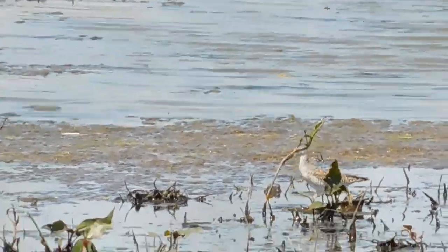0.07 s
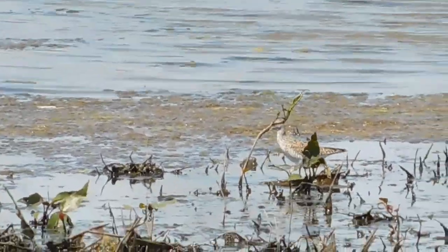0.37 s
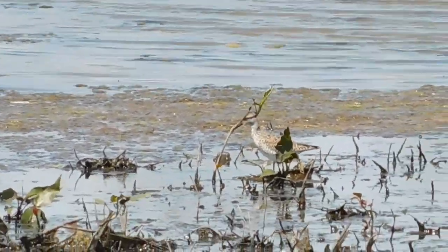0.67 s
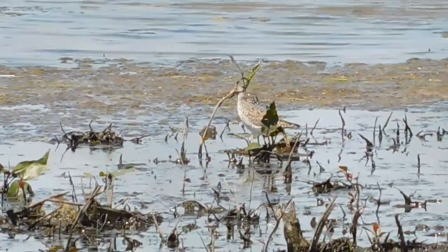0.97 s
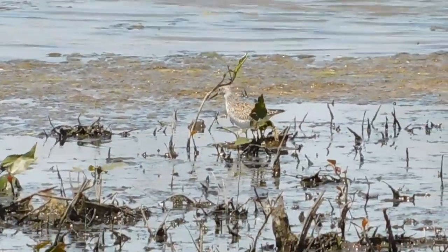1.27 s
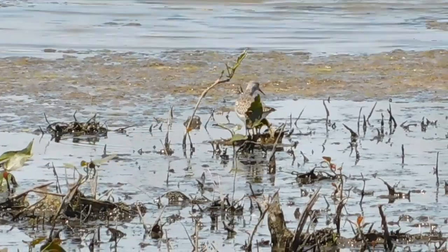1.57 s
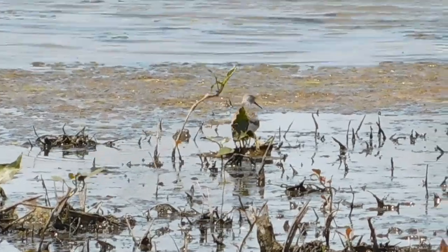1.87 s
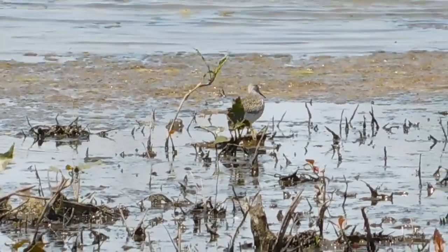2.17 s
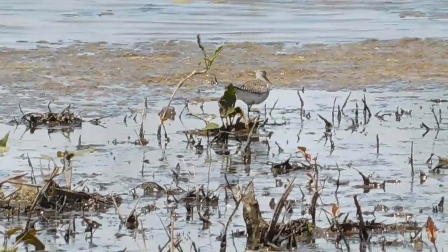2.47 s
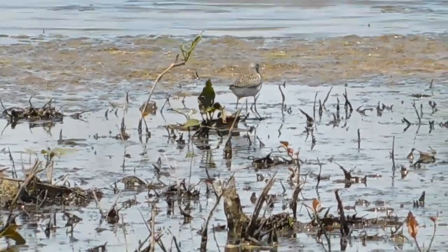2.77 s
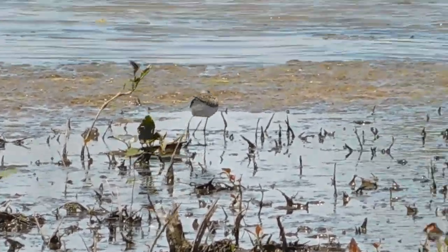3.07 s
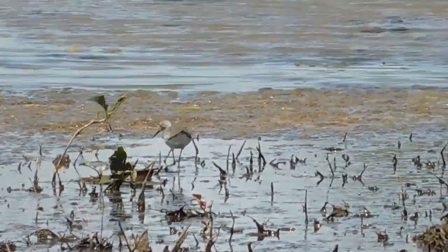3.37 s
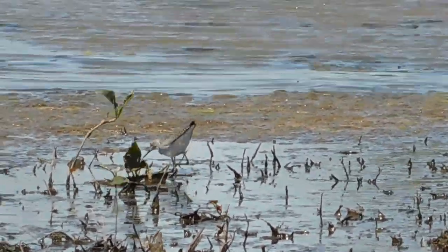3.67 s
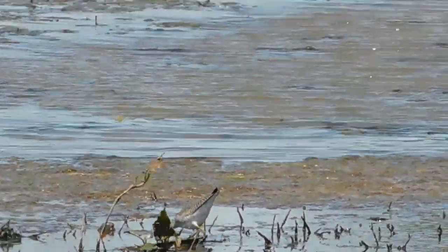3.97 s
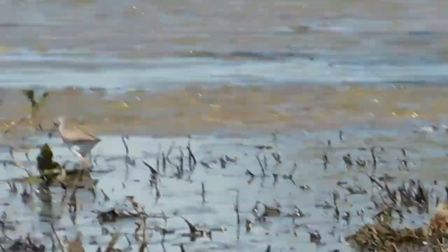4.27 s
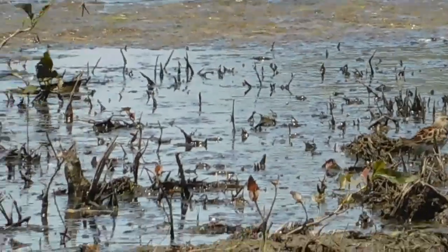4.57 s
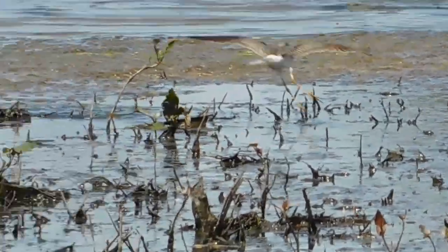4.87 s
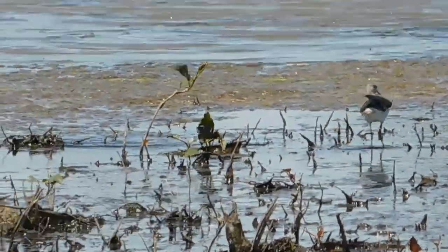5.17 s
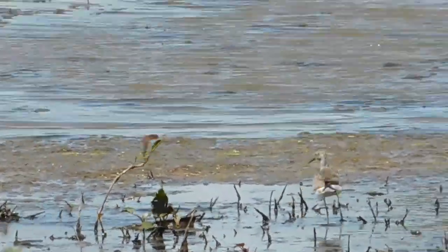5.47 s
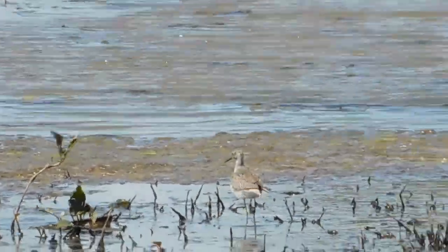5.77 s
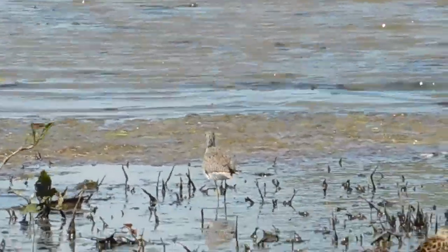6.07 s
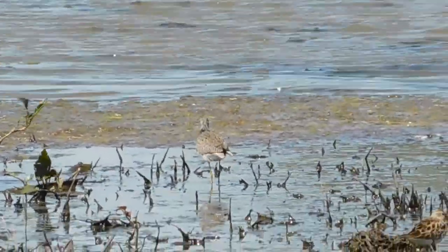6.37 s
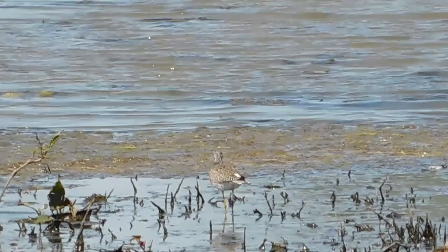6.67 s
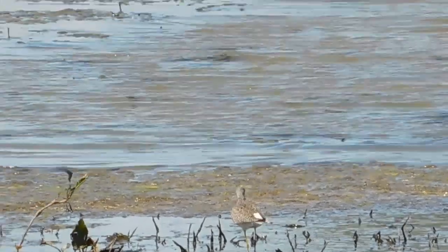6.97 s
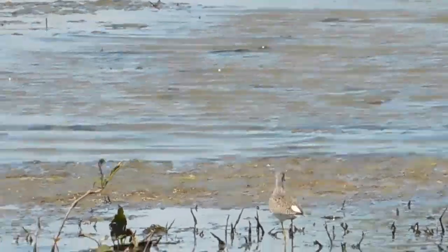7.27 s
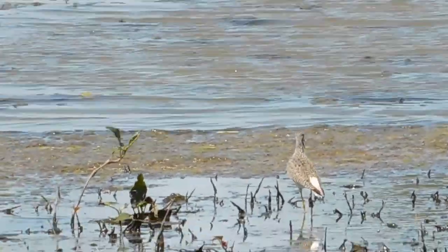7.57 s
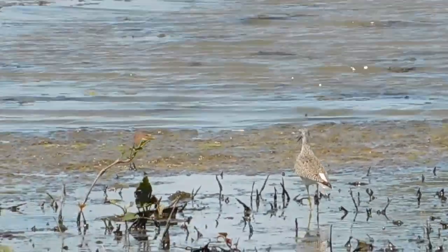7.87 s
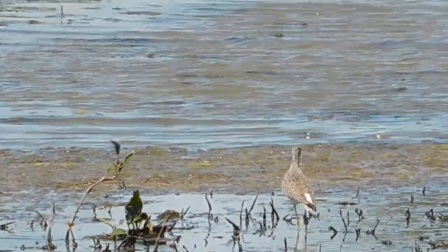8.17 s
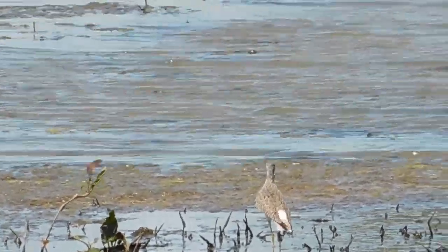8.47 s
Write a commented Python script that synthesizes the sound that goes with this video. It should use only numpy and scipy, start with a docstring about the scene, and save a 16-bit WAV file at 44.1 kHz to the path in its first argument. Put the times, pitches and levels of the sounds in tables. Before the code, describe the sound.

Wind thumps and rumbles on the microphone, easing as a wading bird starts piping rapid, repeated falling notes.

```python
"""A sandpiper whistles on an open marsh, then breaks into a quick run of falling calls: near-pure
tones that glide in pitch, the quick ones shaped by a throat resonance. Far birds chip, trill and toot.
Gusts shed eddies at the two microphone ports of a hand-held camera, hard at first and again at the end.
The camera's lens drive whirs faintly, and its body ticks and rubs under the fingers."""
import sys
import numpy as np
from scipy import signal
from scipy.fft import irfft, next_fast_len
from scipy.io import wavfile
from scipy.ndimage import uniform_filter1d

SR = 44100
rng = np.random.default_rng(int(sys.argv[2]) if len(sys.argv) > 2 else 0)


def wrap_up_sound(samples):
    """Save the sound to the file named by the first command line argument, as 16-bit audio."""
    columns = np.atleast_2d(samples).T
    # keep every value between -1 and 1, then stretch to whole-number steps
    tamed = np.clip(columns, -1, 1)
    steps = np.round(tamed * 32767).astype(np.int16)
    wavfile.write(sys.argv[1], SR, steps)


N = 379701
TIME = np.arange(N) / SR
FREQS = np.fft.rfftfreq(2 * next_fast_len(N // 2 + 1), 1 / SR)

# single hard eddies: time_s, relative_level_db, swing_hz, port (0 left, 1 right)
HARD_EDDIES = [(.205, -1, 400, 1), (0.2165, 4.5, 507, 1), (0.4427, -4.5, 430, 1), (.459, -5.5, 120, 1),
               (.4771, -5.5, 583, 1), (0.684, -11.5, 400, 1), (.8575, -7, 285, 1), (.914, -12, 478, 0),
               (.9822, -3.5, 390, 1), (1.1328, -7.5, 464, 1), (1.2, 1, 535, 1), (1.3034, -1, 600, 1),
               (1.6945, 1.5, 496, 1), (2.3312, -2.5, 900, 1), (2.5043, -5.5, 655, 1),
               (2.5293, -0.5, 750, 1), (2.7664, -10.5, 504, 1), (3.04, -13, 470, 0), (3.103, -9, 460, 0),
               (6.724, -14.5, 507, 0), (7.33, -21, 302, 0), (8.287, -8, 222, 1)]


def gain_of(db):
    """Amplitude ratio: a factor of ten for every 20 dB."""
    return 10 ** (np.asarray(db) / 20)


def unit_rms(x):
    """Normalisation to a mean power of 1."""
    return x / np.sqrt(np.mean(x ** 2) + 1e-30)


def colour(points):
    """Spectral envelope: gain at every frequency, interpolated in dB over log frequency."""
    hz, db = np.transpose(points)
    return gain_of(np.interp(np.log(FREQS + 1), np.log(hz), db))


def noise(gain):
    """Gaussian noise of rms 1, shaped by a spectral envelope."""
    return unit_rms(irfft(gain * rng.standard_normal(2 * len(FREQS)).view(complex))[:N])


def wander(hz):
    """Random modulation: low-pass noise of rms 1, no faster than about hz."""
    return noise(np.exp(-(FREQS / hz) ** 2))


def add(mix, start_s, sound):
    """Superposition: a sound sums into the mix from start_s on."""
    part = mix[max(round(start_s * SR), 0):][:len(sound)]
    part += sound[:len(part)]


def marsh(level_db=-59, shared=0.23):
    """Diffuse field: the wash of open air and water is only weakly coherent between the ports."""
    # spectrum of the wash: frequency_hz, density_db
    spectrum = [(300, -7), (700, 5.5), (1200, 1.5), (3300, -4.5), (3800, -14), (10000, -22), (15500, -29)]
    shape = colour(spectrum)
    return gain_of(level_db) * unit_rms(shared * noise(shape) + np.array([noise(shape), noise(shape)]))


def lens():
    """Resonance: the lens drive whirs in three steady noise bands, largely shared by the ports."""
    # modes of the drive: centre_hz, width_hz, level_db
    modes = [(1685, 49, -75.5), (2023, 204, -63), (3040, 160, -79.5)]
    shape = sum(gain_of(db) / np.sqrt(width) / (1 + ((FREQS - hz) / (width / 2)) ** 2)
                for hz, width, db in modes)
    level = np.sqrt(sum(gain_of(db) ** 2 for _, _, db in modes))
    return level * unit_rms(noise(shape) + 0.5 * np.array([noise(shape), noise(shape)]))


def handling(tick_db=-9, rise_s=0.00018, rub_s=0.045, rub_right_db=-6, slips_per_s=1200, grip_db=-79):
    """Damped impacts and stick-slip friction: the camera body ticks, and fingers rub in tiny slips."""
    # ticks of the body: start_s, relative_level_db, t60_s, left_minus_right_db
    ticks = [(2.21, -19.5, 0.033, 8.5), (3.4915, -45.5, .012, 9), (3.8504, -23, 0.009, -3),
             (4.074, -34.5, 0.017, 6), (5.526, -40.5, 0.023, 5), (8.012, -40, 0.01, 9),
             (8.299, -38, 0.019, 4), (8.564, -31.5, 0.047, 7)]
    # finger strokes: centre_s, level_db
    rubs = [(.53, -56), (1.05, -62.5), (7.71, -62), (8.27, -65), (8.51, -55.5)]
    # spectrum of a tick: frequency_hz, density_db
    tick_spectrum = [(2000, -7), (3100, 8), (4500, 2.5), (8000, 2.5), (15500, -10.5)]
    # spectrum of a rub: frequency_hz, density_db
    rub_spectrum = [(1500, -8), (3700, 1.5), (6500, 2.5), (10000, -0.5), (15500, -40)]
    out, t = np.zeros((2, N)), np.arange(SR // 10) / SR
    stroke = sum(gain_of(db) * np.exp(-((TIME - s) / rub_s) ** 2) for s, db in rubs)
    stroke += gain_of(grip_db + 2.7 * wander(8))  # the grip never rests
    attack = np.minimum(t / rise_s, 1)
    for port, side in enumerate((1, -1)):
        knocks = np.zeros(N)
        for start_s, db, t60_s, pan_db in ticks:
            add(knocks, start_s, attack * gain_of(db + tick_db + side * pan_db / 2 - 60 * t / t60_s))
        slips = rng.exponential(size=N) * (rng.random(N) < slips_per_s / SR)
        friction = stroke * unit_rms(uniform_filter1d(slips, size=40))
        out[port] = knocks * noise(colour(tick_spectrum))
        out[port] += friction * noise(colour(rub_spectrum)) * gain_of(port * rub_right_db)
    return out


def airflow(port, rise_db_per_s=900, sag_db=0.5, drop_db_per_s=556):
    """Power addition: gusts ride on the breeze to give the wind strength at one port, in dB."""
    # strength of the breeze: time_s, left_db, right_db
    breeze = [(0, -44.5, -38), (1.55, -41, -43.5), (2.7, -39, -41.5), (3.3, -51.5, -56), (4.3, -52.5, -54),
              (5.5, -52.5, -56.5), (6.5, -47, -63), (7.0, -51.5, -62), (7.4, -37.5, -42.5),
              (8.6, -38.5, -41)]
    # gusts: start_s, length_s, left_db, right_db
    gusts = [(0, 0.27, -32.5, -27), (0.194, 0.013, -29.5, -21.5), (0.259, 0.043, -42, -22.5),
             (0.44, 0.071, -31, -20.5), (.67, 0.18, -44, -40), (0.849, 0.02, -46, -26.5),
             (0.924, 0.062, -29.5, -28.5), (1.03, 0.12, -36, -38.5), (1.196, 0.071, -35.5, -22),
             (1.285, 0.046, -26.5, -18), (1.343, 0.13, -29, -27), (1.676, 0.12, -32.5, -25),
             (2.201, 0.22, -37.5, -24), (2.444, 0.17, -35, -22), (2.611, 0.064, -36, -31),
             (2.763, 0.19, -41, -33), (3.308, 0.025, -40, -62), (3.601, 0.052, -53, -44),
             (3.842, .19, -65, -35), (4.45, 0.034, -62, -34.5), (4.496, 0.21, -50, -45),
             (4.825, 0.35, -43.5, -72), (5.605, 0.26, -46, -47.5), (6.005, 0.18, -42.5, -47),
             (6.793, 0.1, -40.5, -71), (7.106, 0.031, -32, -53), (7.314, 0.066, -28.5, -36),
             (7.723, 0.15, -38.5, -36), (7.891, 0.29, -35.5, -40.5), (8.159, .14, -34.5, -33.5),
             (8.402, 0.18, -34, -46)]
    times, *breeze_db = np.transpose(breeze)
    power = gain_of(np.interp(TIME, times, breeze_db[port])) ** 2
    for start_s, length_s, *port_db in gusts:
        t = np.arange(-SR // 10, (length_s + 0.2) * SR) / SR
        rise = rise_db_per_s * np.minimum(t, 0)
        sag = sag_db * np.clip(t / length_s, 0, 1)
        drop = drop_db_per_s * np.maximum(t - length_s, 0)
        gust = gain_of(port_db[port] + rise - sag - drop)
        add(power, start_s + t[0], gust[start_s + t >= 0] ** 2)
    return 10 * np.log10(power)


def wakes(port, wake_db=-13, t60_s=0.053):
    """Decay of turbulence: the envelope of the brief churn behind each hard eddy."""
    out, t = np.zeros(N), np.arange(SR // 10) / SR
    for time_s, db, _, side in HARD_EDDIES:
        if round(side) == port:
            add(out, time_s, gain_of(db + wake_db - 60 * t / t60_s))
    return uniform_filter1d(out, size=100)


def recorder_noise(airflow_db, base_db=-65):
    """Modulation noise: faint treble from the recorder swells and fades with the gusts."""
    return noise(FREQS > 2000) * gain_of(base_db + 0.74 * (airflow_db + 33.5) + 2 * wander(150))


def wind(port, rumble_db, flutter_db=5, ceiling_db=-15, steepness=1.62, gain_db=2.5):
    """Turbulence at one port (harder air sheds smaller, higher eddies), with recorder noise added."""
    # spectrum of the slow pressure swings: frequency_hz, density_db
    rumble_spectrum = [(15, -6), (70, -1), (130, -7), (250, -19.5), (500, -36.5), (1500, -81)]
    # weight of those swings: time_s, gain_db
    swell = [(.45, 5), (1.1, -2.5), (2.4, -5), (3.4, -1), (8.6, 5)]
    mean_db = airflow(port)
    push_db = np.minimum(mean_db + flutter_db * np.minimum(wander(179), 2), ceiling_db)
    push_db = 20 * np.log10(np.hypot(gain_of(push_db), wakes(port)))
    corner_hz = 470 * 2 ** ((0.72 * push_db + 0.25 * mean_db + 27.5) / 18)
    eddies, power = np.zeros(N), np.zeros(N)
    for hz in 50 * 2 ** (np.arange(13) / 2):  # bands half an octave apart
        band = np.cos(np.pi / 2 * np.clip(2 * np.log2((FREQS + 1) / hz), -1, 1))
        weight = hz ** 0.94 * np.exp(-(hz / corner_hz) ** steepness)
        eddies += weight * noise(band)
        power += weight ** 2
    eddies *= gain_of(push_db + gain_db) / np.sqrt(power)
    # the rumble follows the gust less closely
    swell_db = np.interp(TIME, *np.transpose(swell))
    rumble = noise(colour(rumble_spectrum)) * gain_of(rumble_db + 0.41 * mean_db + swell_db)
    return eddies + rumble + recorder_noise(mean_db)


def buffets(gain_db=-1.5):
    """Pressure pulses: a hard eddy swings the pressure once or twice; big ones swing slowly and thump."""
    out, t = np.zeros((2, N)), np.arange(-900, 900) / SR
    for (time_s, db, hz, port), turn in zip(HARD_EDDIES, rng.random(len(HARD_EDDIES))):
        cycles = hz * t
        phase = 2 * np.pi * (cycles - 0.27 * np.log(np.cosh(cycles)) + turn)  # slows as it passes
        swing = np.cos(phase) / np.cosh(2.9 * cycles)
        add(out[round(port)], time_s + t[0], gain_of(db + gain_db) * swing)
    return out


def outdoors(x, lag_s, wet_db, t60_s, echo_s=0.0069, echo_db=-16):
    """Propagation: a near echo interferes, the left port lags by lag_s, reeds and banks scatter a tail."""
    t = np.arange(SR) / SR
    x = x + gain_of(echo_db) * np.roll(x, round(echo_s * SR))
    tail = rng.standard_normal((2, SR)) * gain_of(-60 * t / t60_s) * (t > echo_s)
    wet = signal.fftconvolve(x[None], tail / np.linalg.norm(tail[0]), axes=1)[:, :N]
    return np.array([np.roll(x, round(lag_s * SR)), x]) + gain_of(wet_db) * wet


def arch(start_s, length_s, top_at, scoop, fall, power):
    """Frequency glide up to a top and down again: times, share of the note elapsed, pitch ratio."""
    t = np.arange(start_s, start_s + length_s, 1 / SR)
    share = (t - start_s) / length_s
    rise = np.maximum(1 - share / top_at, 0)
    droop = np.maximum((share - top_at) / (1 - top_at), 0)
    return t, share, 1 - scoop * rise ** 3 - fall * droop ** power


def song(notes, octave_bias_db, jitter=0.0044, shimmer=0.13, edge_s=0.0054, rasp=3, rasp_s=0.014):
    """Jitter and shimmer roughen each tone's onset; a second harmonic comes through at its top pitch."""
    out, waver, tremble = np.zeros(N), wander(390), wander(180)
    for t, hz, db in notes:
        rough = 1 + rasp * np.exp(-((t - t[0]) / rasp_s) ** 2)
        wobble = np.interp(t, TIME, waver)
        phase = 2 * np.pi * np.cumsum(hz * (1 + jitter * rough * wobble)) / SR
        edges = np.clip(np.minimum(t - t[0], t[-1] - t) / edge_s, 0, 1)
        octave = gain_of(octave_bias_db - 0.5 * db - 52 * (1 - hz / hz.max())) * (1 + wobble)
        level = np.sqrt(2) * gain_of(db) * edges * (1 + shimmer * rough * np.interp(t, TIME, tremble))
        add(out, t[0], level * (np.sin(phase) + octave * np.sin(2 * phase)))
    return out


def toots(first_s=3.37, every_s=0.49, hz=1015, width_s=0.02, db=-61):
    """Tone bursts: a far bird repeats one soft low note at an even pace."""
    notes = sum(np.exp(-((TIME - first_s - k * every_s) / width_s) ** 2) for k in range(8))
    return gain_of(db) * notes * np.sin(2 * np.pi * hz * TIME)


def trill(hz=3000, pulses_per_s=47, width_s=0.079, db=-59):
    """Amplitude modulation: a faint tone from across the marsh pulses in three short stretches."""
    stretches = sum(np.exp(-((TIME - s) / width_s) ** 2) for s in (7.85, 8.23, 8.6))
    throb = np.sin(np.pi * pulses_per_s * TIME) ** 2
    phase = 2 * np.pi * np.cumsum(hz * (1 + 0.0109 * wander(196))) / SR
    return 2 * gain_of(db) * stretches * throb * np.sin(phase)


def chips(length_s=0.0364, sweep=0.31, ends_db=-6.5):
    """Frequency sweeps: small birds give tiny arched notes, each split at random into rise and fall."""
    # far chips: start_s, top_pitch_hz, level_db
    calls = [(3.017, 4250, -69), (4.217, 3930, -61.5), (4.314, 4080, -57.5), (5.495, 4400, -63),
             (5.583, 4200, -66), (5.683, 4070, -61.5), (5.793, 3970, -61), (6.005, 5750, -71),
             (7.393, 2850, -59)]
    notes = []
    for start_s, top_hz, db in calls:
        scoop = sweep * rng.random() / 2
        t, share, pitch = arch(start_s, length_s, top_at=0.35, scoop=scoop, fall=sweep - scoop, power=2.05)
        notes.append((t, top_hz * pitch, db + ends_db * (2 * share - 1) ** 2))
    return song(notes, octave_bias_db=-70, jitter=0.015)


def sandpiper_whistles(ends_db=-6.5):
    """Frequency modulation: each slurred note scoops up, then droops, and is loudest in the middle."""
    # opening whistles: start_s, length_s, top_pitch_hz, level_db, fall_share
    calls = [(5.296, 0.082, 2720, -54, 0.2), (5.376, 0.054, 2360, -54, 0.018),
             (5.578, 0.11, 2636, -49.5, 0.13), (5.87, 0.089, 2710, -50, 0.18),
             (6.052, 0.067, 2830, -46, 0.22), (6.124, 0.043, 2510, -49.5, 0.046)]
    notes = []
    for start_s, length_s, top_hz, db, fall in calls:
        t, share, pitch = arch(start_s, length_s, top_at=0.168, scoop=0.052, fall=fall, power=1.48)
        notes.append((t, top_hz * pitch, db + ends_db * (2 * share - 1) ** 2))
    return song(notes, octave_bias_db=-50)


def sandpiper_run(sweep=0.245, top_at=0.277, onset_db=-9, throat_hz=2754, throat_width_hz=143):
    """Source and filter: each call flicks up, then swells as it falls through the throat's resonance."""
    # quick calls: start_s, length_s, top_pitch_hz, level_at_resonance_db
    calls = [(6.233, 0.059, 3110, -57), (6.37, 0.058, 3210, -43), (6.54, 0.075, 3240, -53),
             (6.742, 0.07, 3310, -51), (6.942, 0.068, 3190, -46), (7.103, 0.078, 3110, -44),
             (7.31, 0.068, 3170, -44), (7.531, 0.081, 3200, -43.5), (7.714, .071, 3140, -43.5),
             (7.887, 0.071, 3130, -43.5), (8.068, 0.079, 3110, -48), (8.256, 0.064, 3210, -49.5),
             (8.486, 0.075, 3130, -47.5)]
    pointed_until_s, settle_s = 6.4, 0.56  # the pitch arches start pointed and grow rounder
    notes = []
    for start_s, length_s, top_hz, db in calls:
        settled = 1 - np.exp(-max(start_s - pointed_until_s, 0) / settle_s)
        roundness = 0.86 * settled + 0.12 * rng.standard_normal()
        t, share, pitch = arch(start_s, length_s, top_at, scoop=sweep, fall=sweep, power=1 + roundness)
        attack_db = onset_db * np.maximum(1 - share / top_at, 0)
        throat_db = -roundness * ((top_hz * pitch - throat_hz) / throat_width_hz) ** 2
        notes.append((t, top_hz * pitch, db + attack_db + throat_db))
    return song(notes, octave_bias_db=-35)


def birds(lag_s=8.4e-5):
    """Localisation: delay and level put the sandpiper to the right; more scatter sets the rest far off."""
    sandpiper = sandpiper_whistles() + sandpiper_run()
    small_birds = chips()
    near = outdoors(sandpiper, lag_s, wet_db=-23, t60_s=0.72) * gain_of([[-0.7], [0.3]])
    far = outdoors(small_birds + trill() + toots(), -lag_s / 2, wet_db=-5, t60_s=0.15)
    return near + far


def scene():
    """Superposition: each port catches its own wind and buffets; everything else reaches both."""
    ports = np.array([wind(0, rumble_db=-23.5), wind(1, rumble_db=-18)])
    return ports + buffets() + birds() + handling() + lens() + marsh()


def record(dry, cutoff_hz=15850):
    """Clipping and band limiting: the hardest buffet overloads the microphone; a low-pass follows."""
    low_pass = signal.firwin(511, cutoff_hz, window=("kaiser", 9), fs=SR)
    return signal.oaconvolve(np.clip(dry, -1, 1), low_pass[None], "same")


dry = scene()
out = record(dry)
wrap_up_sound(out)
```